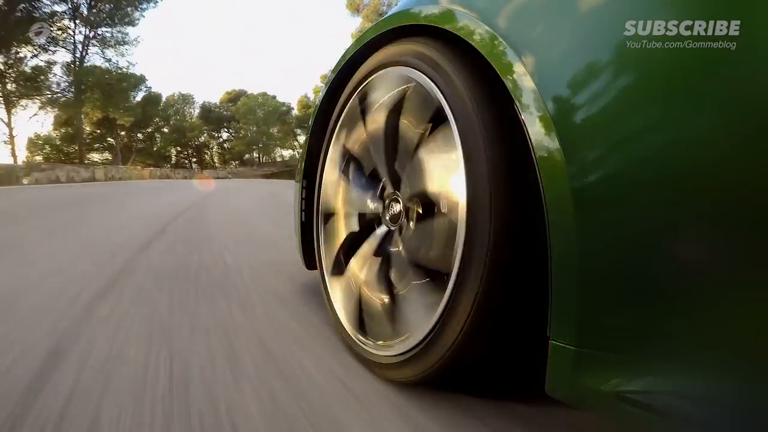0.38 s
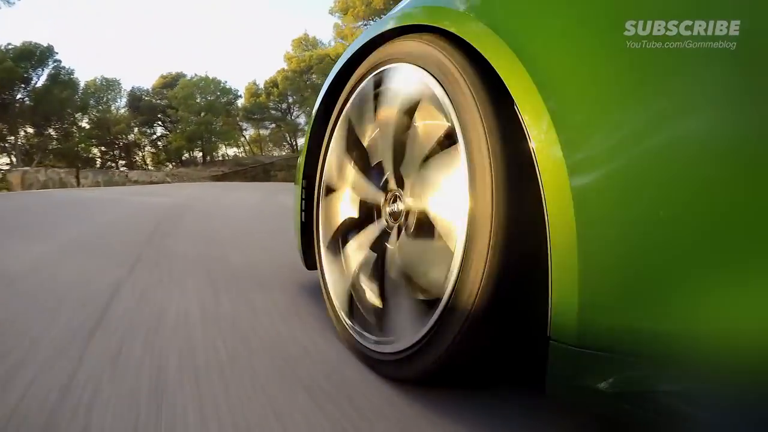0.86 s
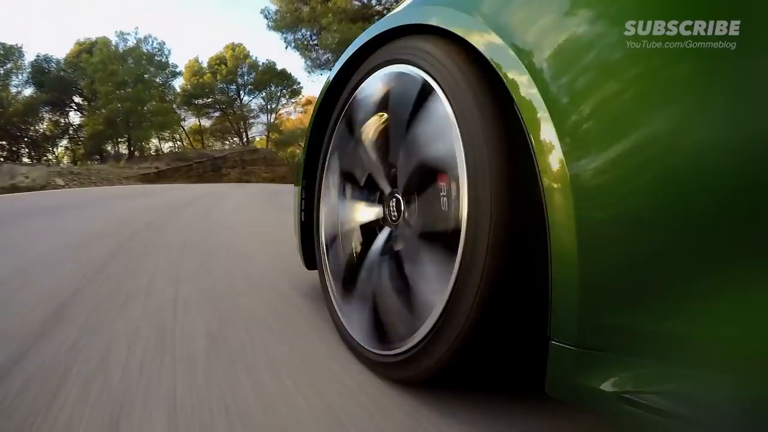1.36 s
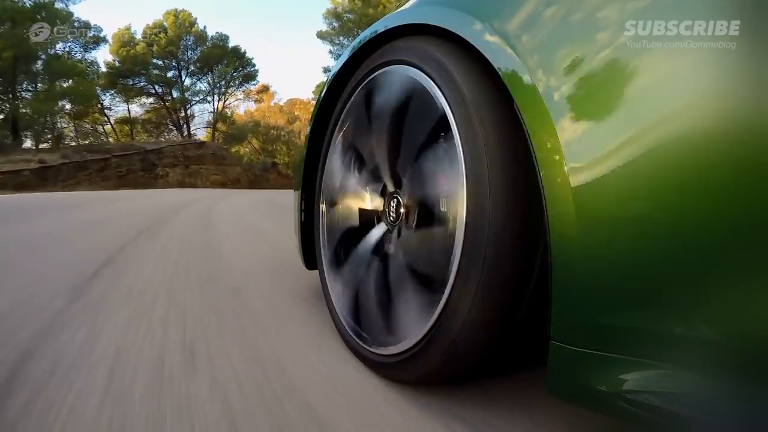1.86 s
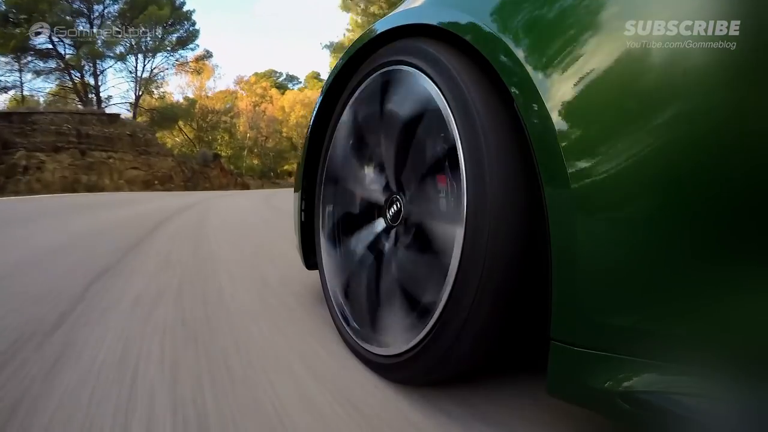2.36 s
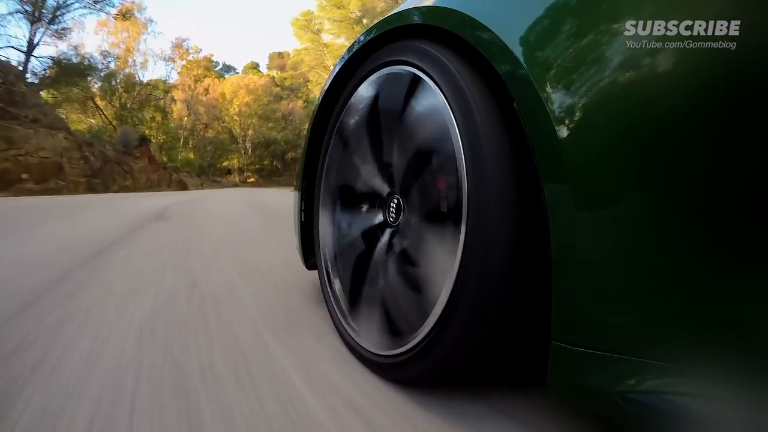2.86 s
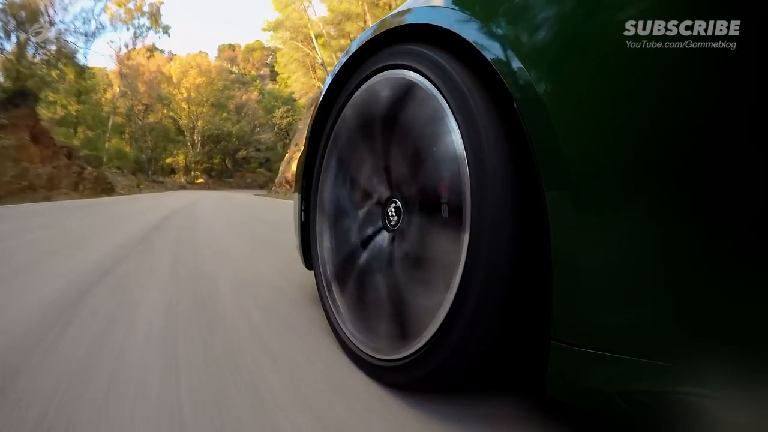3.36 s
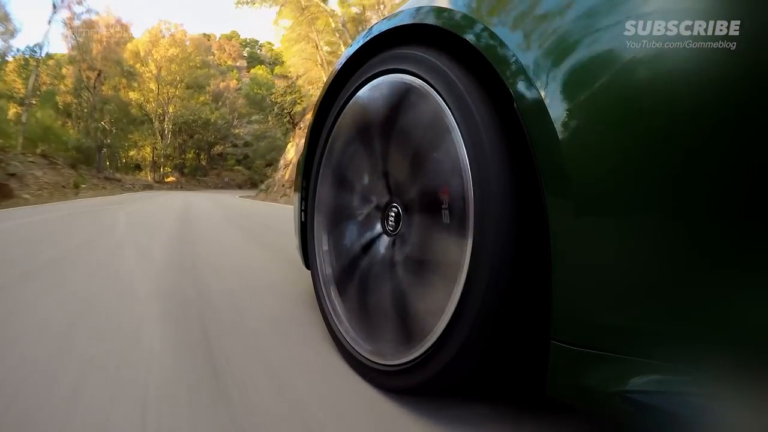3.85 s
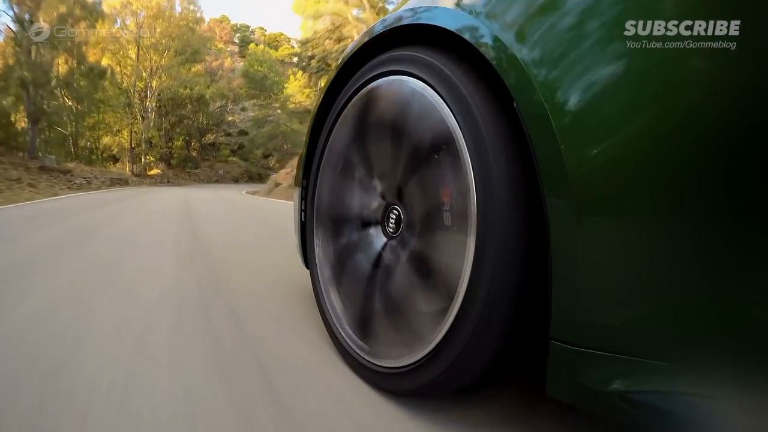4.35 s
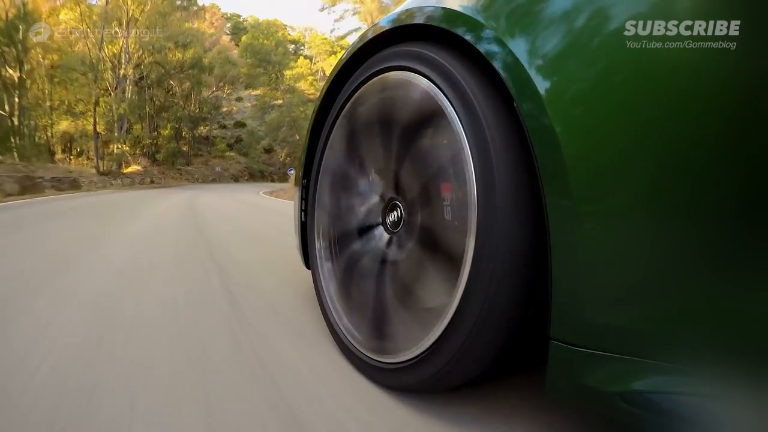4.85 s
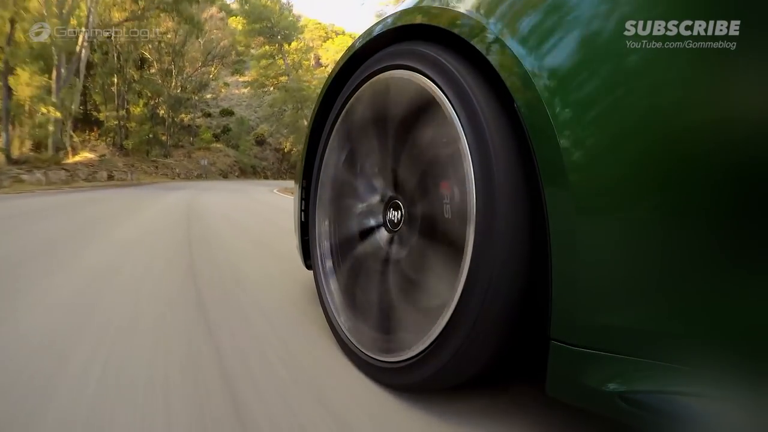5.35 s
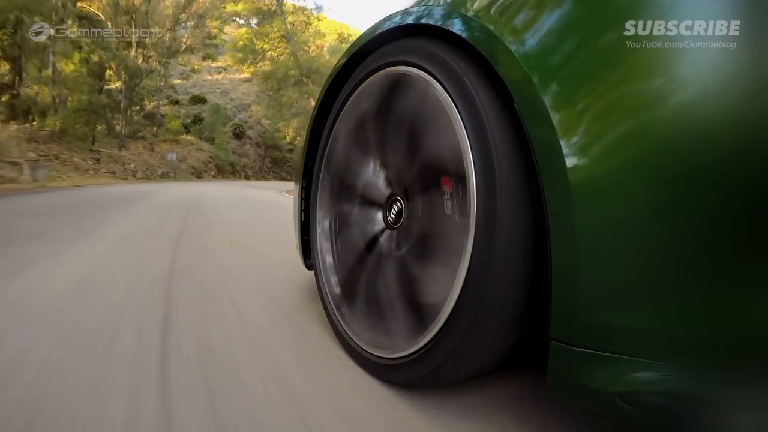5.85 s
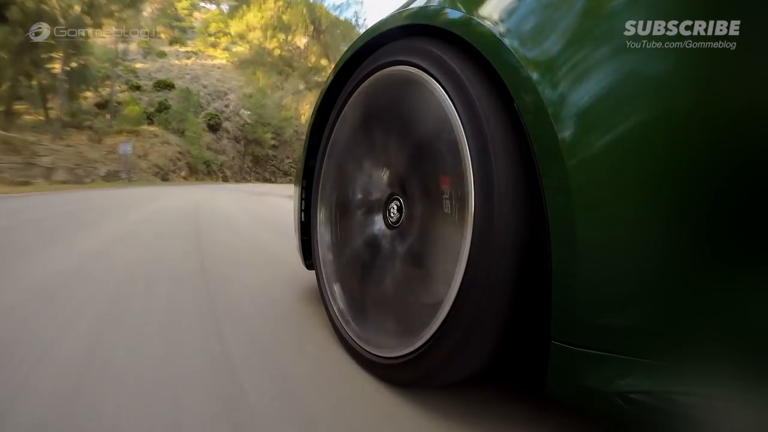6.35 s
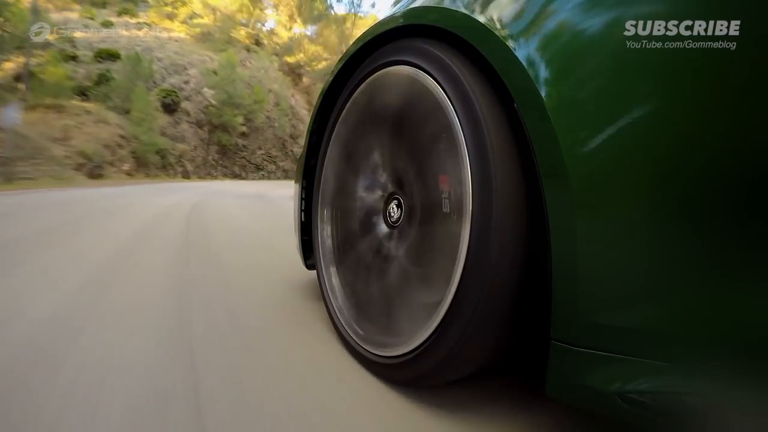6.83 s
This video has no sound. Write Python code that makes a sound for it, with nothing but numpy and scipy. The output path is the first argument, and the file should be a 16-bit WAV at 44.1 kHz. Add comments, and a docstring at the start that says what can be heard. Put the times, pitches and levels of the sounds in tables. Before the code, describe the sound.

A six-cylinder turbo car engine drones steadily, climbs in pitch, drops sharply as the throttle lifts, then pulls again over heavy rumble and tyre roar.

```python
"""On a car's bodywork: a turbocharged six-cylinder engine pulls, lifts off, drops and pulls again.
Sines on engine orders make drone and gearing; knock patterns repeat at fixed crank angles over gas noise.
Alternator lines whine on multiples of its shaft speed; the turbo whistle is one short falling sine.
The body booms as a narrow low rumble that swells and sinks, over shaped shaking noise;
the tyres roar as lumpy shaped noise."""
import sys
import numpy as np
from scipy import signal
from scipy.fft import rfft, irfft, next_fast_len
from scipy.io import wavfile
from scipy.ndimage import map_coordinates

SR = 44100
rng = np.random.default_rng(int(sys.argv[2]) if len(sys.argv) > 2 else 0)


def boost(x):
    """Linear amplitude factor 10**(x/20) for a level x in decibels (scalar or array-like)."""
    u = np.asarray(x, float) / 20
    return 10 ** u


def transcribe(u):
    """Save the signal u as a 16-bit wav file named by the first command-line argument.

    u: samples, shape (n,) or (channels, n), limited to [-1, 1]; the rate is SR.
    q: integer samples, one column per channel.
    """
    v = np.clip(np.atleast_2d(u).T, -1, 1)
    q = np.round(v * 32767).astype(np.int16)
    wavfile.write(sys.argv[1], SR, q)


N = 317961

# engine speed: t/s, four-stroke cycle rate f/Hz
SPEED = [(0.0, 32.05), (0.3, 32.4), (0.55, 32.05), (1.05, 32.4), (1.2, 32.2), (1.35, 32.65), (1.65, 33.15),
         (2.1, 34.6), (2.55, 36.6), (3.0, 39.0), (3.15, 39.57), (3.22, 39.54), (3.29, 38.72), (3.36, 37.01),
         (3.57, 31.38), (3.64, 29.8), (3.71, 29.03), (3.85, 28.36), (4.05, 28.92), (4.5, 30.22),
         (5.1, 32.3), (5.4, 32.5), (5.7, 32.48), (6.15, 31.92), (6.6, 31.28), (7.21, 30.16)]
# gas and metal noise, before swells: t/s, exhaust level/dB, engine bay level/dB
LOAD = [(0.0, -47, -47.5), (0.92, -46, -48.5), (1.0, -44.5, -48), (1.53, -43, -48.5), (2.55, -42, -45.5),
        (2.75, -40, -45), (3.09, -39, -46.5), (3.21, -40.5, -47), (3.27, -44, -48.5), (3.41, -50, -50.5),
        (3.65, -46.5, -52.5), (3.76, -43, -51), (3.99, -45, -51), (4.28, -42.5, -50), (4.54, -43, -49),
        (4.58, -45, -52.5), (4.96, -42.5, -47.5), (5.04, -46, -52), (5.14, -44.5, -51), (5.22, -51, -52),
        (6.06, -45.5, -47), (6.16, -48, -50.5), (6.55, -45, -48), (7.21, -48, -48)]
LOAD_REF_DB, BAY_REF_DB = -44, -48  # exhaust and bay levels at which load-driven lines have their table levels


def unit(x):
    """Scale to rms 1."""
    return x / np.sqrt(np.mean(x ** 2) + 1e-20)


def curves(rows):
    """One value per sample for each column after the time."""
    s, *cols = np.transpose(rows)
    return [np.interp(np.arange(N) / SR, s, c) for c in cols]


def along(points, hz):
    """(f/Hz, value) points read on a log frequency axis."""
    f, v = np.transpose(points)
    return np.interp(np.log(hz), np.log(f), v)


def whole(lines):
    """Whole multiples and their levels."""
    k, db = np.transpose(lines)
    return np.round(k), db


def wobble(rate):
    """Smooth random curve, rate knots/s."""
    return map_coordinates(rng.standard_normal(int(N * rate / SR) + 4), [np.arange(N) * rate / SR])


def coloured(x, spectrum):
    """x filtered by (f/Hz, gain/dB) points, at rms 1."""
    m = next_fast_len(N + 8192)
    hz, db = np.transpose(spectrum)
    log_hz = np.log(np.fft.rfftfreq(m, 1 / SR) + 1)
    gain = boost(np.interp(log_hz, np.log(hz + 1), db))
    return unit(irfft(rfft(x, m) * gain, m)[:N])


def tone(turns, db, unsteady_db, slip, rate):
    """Sine of rms db on a phase in turns; level wavers by unsteady_db, phase by slip rad, at rate knots/s."""
    phase = 2 * np.pi * (turns + rng.random()) + slip * wobble(rate)
    return np.sqrt(2) * boost(db + unsteady_db * wobble(rate)) * np.sin(phase)


def knocks(cycles, renew, size):
    """Blows at fixed crank angles: a random pattern repeats each cycle, renewing itself renew times/s."""
    pattern = rng.standard_normal((int(N * renew / SR) + 4, size))
    age = np.arange(N) * renew / SR
    return unit(map_coordinates(pattern, [age, cycles % 1 * size], mode="grid-wrap"))


def engine():
    """Crank-locked sound and gas noise of exhaust and bay follow speed and load; off throttle, noise leads."""
    # crank-locked sound against gas noise: t/s, relative level/dB
    combustion = [(0, -2), (1, -1), (1.3, 0), (3.22, 0), (3.3, -12), (3.66, -12), (3.74, -1), (5.16, -1),
                  (5.24, -9), (6.2, -6), (6.5, -4), (7.21, -5)]
    cycle_hz = curves(SPEED)[0]
    cycles = np.cumsum(cycle_hz) / SR
    exhaust_db, bay_db = curves(LOAD)
    firing_db = curves(combustion)[0]
    firing = boost(firing_db)
    # gas noise swells with the firings
    puffs = 1 + 0.19 * np.cos(2 * np.pi * 6 * cycles) + 0.036 * np.cos(2 * np.pi * 2 * cycles)
    swell = wobble(9)
    low = drone(cycle_hz, cycles, exhaust_db, firing_db) + overrun_boom()
    pipe = boost(exhaust_db + 0.63 * swell) * exhaust(cycles, firing, puffs)
    bay = boost(bay_db + 0.52 * swell) * engine_bay(cycles, firing, puffs)
    return low + pipe + bay + panel_ring() + intake_hiss(bay_db)


def drone(cycle_hz, cycles, exhaust_db, firing_db):
    """Low exhaust orders sweep through the pipe's response; the firing tone runs at six times the cycle."""
    # drone lines: cycle multiple, growth with exhaust load/(dB/dB), growth with combustion/(dB/dB)
    orders = [(3, 2, 0.44), (4, 0.2, 2.8)]
    # pipe response to the drone at the reference load: f/Hz, level/dB
    duct = [(84, -33), (90, -30), (100, -28), (108, -36), (114, -35.5), (123, -45), (129, -35.5),
            (134, -39), (142, -30), (148, -37.5), (157, -29)]
    # firing tone: t/s, level/dB
    firing_tone = [(0, -36), (0.9, -40), (1.4, -40), (1.9, -44), (2.4, -39), (3.3, -37), (3.45, -54),
                   (3.7, -39), (4.1, -44.5), (4.3, -44), (4.38, -32.5), (4.55, -34), (4.7, -40.5),
                   (5.1, -44.5), (5.35, -54), (5.55, -39.5), (6.1, -50), (6.4, -38.5), (6.75, -37),
                   (6.92, -43.5), (7.21, -36)]
    total = tone(6 * cycles, curves(firing_tone)[0], unsteady_db=1.2, slip=0.41, rate=8)
    for k, pull, burn in orders:
        k = round(k)
        load_db = pull * (exhaust_db - LOAD_REF_DB) + burn * firing_db
        line_db = along(duct, k * cycle_hz) + load_db
        total = total + tone(k * cycles, line_db, unsteady_db=1.87, slip=0.43, rate=7)
    return total


def overrun_boom():
    """Low falling boom as the throttle shuts: sines on a pitch of its own and its overtones."""
    # boom: t/s, f/Hz, level before overtone offsets/dB
    overrun = [(0, 80.7, -70), (3.2, 80, -70), (3.25, 79.4, -45), (3.29, 79.9, -22.5), (3.36, 77.95, -20),
               (3.5, 71, -23), (3.57, 66.2, -28), (3.62, 61, -44), (3.68, 60.2, -70), (7.21, 60, -70)]
    # its overtones: multiple, level offset/dB
    overtones = [(1, 1), (2, -13), (4, -22.5)]
    hz, level_db = curves(overrun)
    turns = np.cumsum(hz) / SR
    return sum(tone(k * turns, level_db + db, unsteady_db=1.0, slip=0.2, rate=6.33)
               for k, db in zip(*whole(overtones)))


def exhaust(cycles, firing, puffs):
    """Order ladder through the silencer and rasp of repeating knocks, over pulsing gas noise."""
    # order lines ahead of the silencer: cycle multiple, relative level/dB
    ladder_lines = [(5, -0.5), (7, -12), (8, -8.5), (9, -5.5), (10, -6.5), (11, -7.5), (12, -3.5),
                    (13, -7.5), (14, -13.5), (15, -12), (16, -6.5), (17, -17), (18, -10), (19, -10),
                    (20, -10.5), (21, -16), (22, -10.5), (23, -15), (24, -8), (25, -18)]
    # silencer, knock and pipe-noise colours: f/Hz, relative gain/dB
    silencer = [(120, 0.5), (200, -0.5), (260, 3.5), (285, -0.6), (305, 5), (345, -3), (370, 2), (440, -1),
                (510, -2), (570, 2.5), (620, 0.5), (680, -4.8), (780, -9), (950, -34)]
    knock = [(600, -66), (740, -1), (900, 3), (1020, -2), (1170, -0.6), (1300, -9.5), (1450, -79)]
    pipe = [(120, 0.5), (200, -3), (257, -5.5), (400, -6), (498, -13), (887, -10), (978, -12.5),
            (1110, -8.5), (1300, -20.5), (1400, -8.5), (1820, -72), (3080, -120)]
    ladder = sum(tone(k * cycles, db, unsteady_db=2.2, slip=.6, rate=5)
                 for k, db in zip(*whole(ladder_lines)))
    ladder = boost(4) * coloured(ladder, silencer)
    rasp = boost(-7) * coloured(knocks(cycles, renew=2.2, size=256), knock)
    gas = boost(0.5) * coloured(puffs * rng.standard_normal(N), pipe)
    return firing * (ladder + rasp) + gas


def engine_bay(cycles, firing, puffs):
    """Gearing lines and repeating knocks locked to the crank, over pulsing noise."""
    # gearing lines: cycle multiple, relative level/dB
    gearing = [(41, -13.5), (45, -7.5), (46, -39), (51, -11), (54, -9.5), (60, -21), (64, -14.5),
               (66, -16.5)]
    # bay colour: f/Hz, relative gain/dB
    bay = [(710, -76), (1200, -7.5), (1320, -16), (1480, 3), (1780, 1.5), (1950, -2.5), (2150, -2.5),
           (2330, -9), (2530, -8), (2800, -11.5), (3180, -6), (3430, -9), (3760, -5), (4120, -16.5),
           (4400, -20), (5720, -50), (9680, -120)]
    gears = sum(tone(k * cycles, db, unsteady_db=2.2, slip=.5, rate=4) for k, db in zip(*whole(gearing)))
    clatter = boost(-0.5) * coloured(knocks(cycles, renew=1.63, size=320), bay)
    gas = boost(0.05) * coloured(puffs * rng.standard_normal(N), bay)
    return firing * (gears + clatter) + gas


def panel_ring():
    """Narrow-band noise: a nearly steady panel ring."""
    # ring colour: f/Hz, relative gain/dB
    panel = [(1330, -40), (1410, -27), (1460, 4), (1520, 4), (1600, -12), (1750, -22)]
    return boost(-57 + 0.5 * wobble(10)) * coloured(rng.standard_normal(N), panel)


def intake_hiss(bay_db):
    """Intake hiss: treble noise growing faster than the bay level."""
    # hiss colour: f/Hz, relative gain/dB
    hiss = [(2350, -26), (4000, -6.5), (4270, -7), (4830, -1.5), (5250, -6), (8380, -9), (9710, -12),
            (10900, -20.5), (11400, -15), (12000, -61), (15600, -85), (22000, -120)]
    ref_db, growth_db_per_db = -53.5, 1.28
    level_db = ref_db + growth_db_per_db * (bay_db - BAY_REF_DB)
    return boost(level_db) * coloured(rng.standard_normal(N), hiss)


def alternator():
    """Magnetic whine on multiples of the belt-driven shaft; belt flutter blurs the higher lines more."""
    # main lines: shaft multiple, level at the reference bay level before casing/dB
    slots = [(12, -53.5), (18, -64), (30, -67.5), (36, -63.5), (42, -70.5)]
    # weaker lines, independent of load and casing: shaft multiple, level/dB
    faint = [(13, -66), (17, -69), (19, -89), (22, -75), (31, -88)]
    # casing and bodywork response: f/Hz, gain/dB
    casing = [(1900, -5), (2100, 1.5), (2170, 1), (2300, -5), (2520, 0.5), (2660, -4.5), (3200, 3.5),
              (3500, 1), (3850, -12), (5000, -20), (5450, 1), (5780, 0), (5950, 4.5), (6150, -3),
              (6550, -0.5), (7040, 3), (7300, -3), (7600, 2), (8000, -0.5), (8500, 4), (9300, 7)]
    # upper main lines: t/s, gain/dB
    upper_whine = [(0, 0), (1.5, 2), (3.2, -0.5), (3.6, -2), (4.0, -7), (4.2, 2), (4.5, -3), (5.4, -2),
                   (6.0, -1.5), (7.21, -1)]
    pulley_ratio, upper_from = 5.633, 30  # shaft turns per four-stroke cycle; first upper multiple
    shaft_hz = pulley_ratio * curves(SPEED)[0]
    turns = np.cumsum(shaft_hz) / SR + 0.0044 * wobble(60)
    effort_db = curves(LOAD)[1] - BAY_REF_DB  # 1 dB per dB of bay noise
    upper_db = curves(upper_whine)[0]
    lines = list(zip(*whole(faint)))
    for k, db in zip(*whole(slots)):
        line_db = db + effort_db + along(casing, k * shaft_hz)
        lines.append((k, line_db + (k >= upper_from) * upper_db + 0.82 * wobble(2.97)))
    return sum(tone(k * turns, db, unsteady_db=2.0, slip=0.29, rate=25) for k, db in lines)


def turbo():
    """Turbocharger whistle: a short sine falling in pitch as the rotor runs down."""
    # whistle: t/s, f/Hz, level/dB
    whistle = [(5.24, 8700, -90), (5.28, 8380, -66), (5.34, 7890, -64), (5.39, 7550, -70),
               (5.43, 7470, -90)]
    hz, db = curves(whistle)
    return tone(np.cumsum(hz) / SR, db, unsteady_db=2.0, slip=.8, rate=40)


def body():
    """Narrow low rumble at a wandering pitch over broader shaking, which gives way to the rumble's swells."""
    # rumble pitch: t/s, f/Hz
    boom_hz = [(0, 27.72), (.6, 33.45), (1.3, 31.47), (2.1, 31.38), (2.9, 30.8), (3.3, 27.8), (3.75, 24.7),
               (4.4, 26.51), (5.1, 29.32), (5.8, 30.55), (6.3, 27.27), (6.7, 30.89), (7.21, 27.06)]
    # shaking, before the swells duck it: t/s, level/dB
    shaking_level = [(0, -27), (0.6, -25.5), (1.5, -24.5), (3.1, -25), (3.4, -22.5), (3.9, -29.5),
                     (4.6, -24), (5.2, -22.5), (6.0, -29.5), (6.8, -24.5), (7.21, -22)]
    # shaking colour: f/Hz, relative gain/dB
    shake = [(8, -28), (14, -4.5), (20, 3), (26, -4.5), (34, -8), (40, 2), (46, -8.5), (60, -27), (78, -47),
             (130, -120)]
    swing, room = boom_swing()
    turns = np.cumsum(curves(boom_hz)[0]) / SR
    boom = swing * tone(turns, -1.13, unsteady_db=0.26, slip=0.79, rate=8)
    ducking = 0.6 + 0.43 * room
    shaking = boost(curves(shaking_level)[0]) * ducking * coloured(rng.standard_normal(N), shake)
    return boom + shaking


def boom_swing():
    """Signed envelope of a narrow low rumble: louder swells listed, random sway in the room left; and room."""
    # the rumble's louder random swells: mid t/s, relative peak level/dB, hold/s
    swell_rows = [(0.06, -16, 0.12), (0.38, -16, 0.089), (0.54, -14.5, 0.024), (0.68, -12.5, 0.029),
                  (0.84, -12, 0.034), (1.1, -17.5, 0.054), (1.28, -18.5, 0.11), (1.72, -18, 0.057),
                  (1.88, -15, 0.034), (2.12, -20, 0.044), (2.52, -15.5, 0.067), (2.94, -19, 0.041),
                  (3.26, -13.5, 0.051), (3.82, -12.5, 0.027), (3.91, -14.5, .03), (4.05, -15, 0.097),
                  (4.22, -17, 0.19), (4.57, -15, 0.055), (5.02, -13, 0.099), (5.23, -13, 0.052),
                  (5.4, -13.5, 0.029), (5.6, -18.5, .14), (5.83, -14.5, 0.13), (6.13, -12.5, 0.043),
                  (6.35, -15.5, 0.15), (6.56, -20, 0.041), (6.75, -19, 0.071), (6.87, -13.5, 0.034),
                  (7.1, -17, 0.061)]
    rise_db_per_s, fall_db_per_s = 260, 263
    sway_db = -25  # on the same relative scale as the swells
    lull_s, lull_width_s = 6.01, 0.082  # room closes once
    t, swells = np.arange(0, N + 64, 64) / SR, 0
    for k, (s, db, hold) in enumerate(swell_rows):
        before = np.maximum(s - hold / 2 - t, 0)
        after = np.maximum(t - s - hold / 2, 0)
        sign = (-1) ** k  # the phase flips from one swell to the next
        swells = swells + sign * boost(db - rise_db_per_s * before - fall_db_per_s * after)
    outside_lull = 1 - np.exp(-((t - lull_s) / lull_width_s) ** 4)
    room = outside_lull / (1 + (swells / boost(sway_db)) ** 2)
    swells, room = (np.interp(np.arange(N) / SR, t, v) for v in (swells, room))
    return swells + room * boost(sway_db) * wobble(13), room


def tyres():
    """Road roar: low noise, randomly lumpy in level."""
    # roar: t/s, level/dB
    road = [(0.0, -29), (2.0, -33), (2.6, -33), (2.88, -28.5), (3.05, -29.5), (3.35, -27.5), (3.55, -33),
            (4.12, -32), (4.46, -27.5), (4.6, -32), (5.05, -30), (5.35, -31.5), (5.55, -30.5), (5.84, -27),
            (6.2, -30), (6.65, -27.5), (7.21, -30)]
    # roar colour: f/Hz, relative gain/dB
    tyre_colour = [(35, -30), (52, 0.5), (65, 3.5), (85, 0.5), (130, -2.5), (165, -9.5), (256, -11.5),
                   (350, -19), (450, -19.5), (700, -32), (1100, -72)]
    lumps = boost(1.25 * wobble(13))
    return boost(curves(road)[0]) * coloured(lumps * rng.standard_normal(N), tyre_colour)


def scene():
    """All sources reach one microphone."""
    return (engine() + alternator() + turbo() + body() + tyres())[None]


def low_pass(x):
    """Removes everything above the highest recorded frequency."""
    return signal.sosfilt(signal.butter(12, 12150, fs=SR, output="sos"), x)


def record(dry):
    """The input saturates smoothly towards +-0.5, rounding off the tallest bass swings."""
    rounded = dry / (1 + np.abs(dry / .5) ** 4.5) ** (1 / 4.5)
    return low_pass(rounded)


dry = scene()
out = record(dry)
transcribe(out)
```